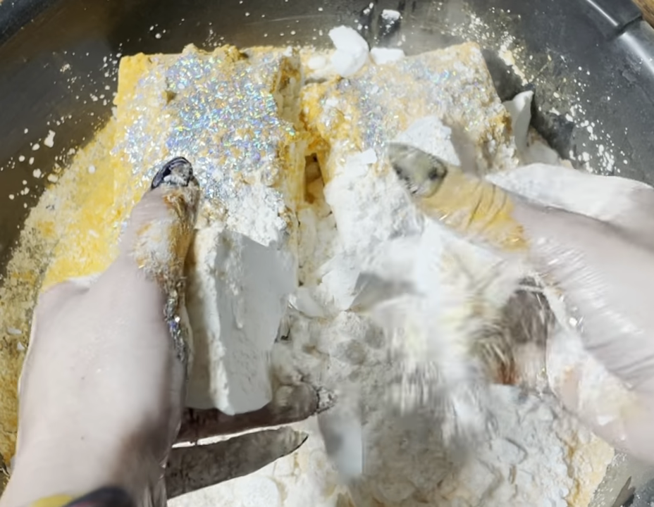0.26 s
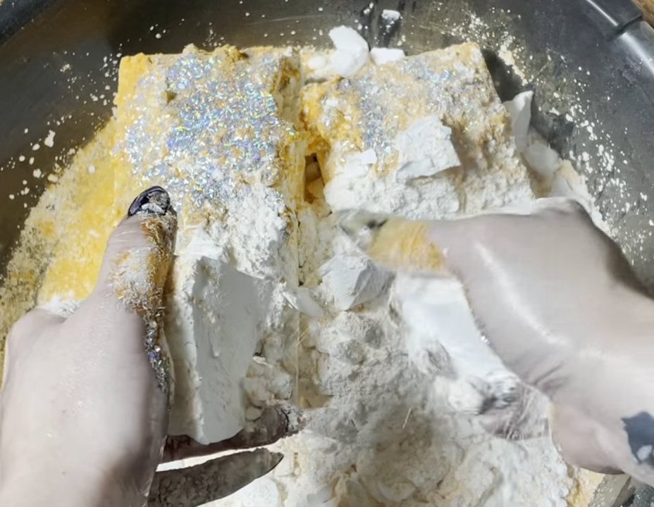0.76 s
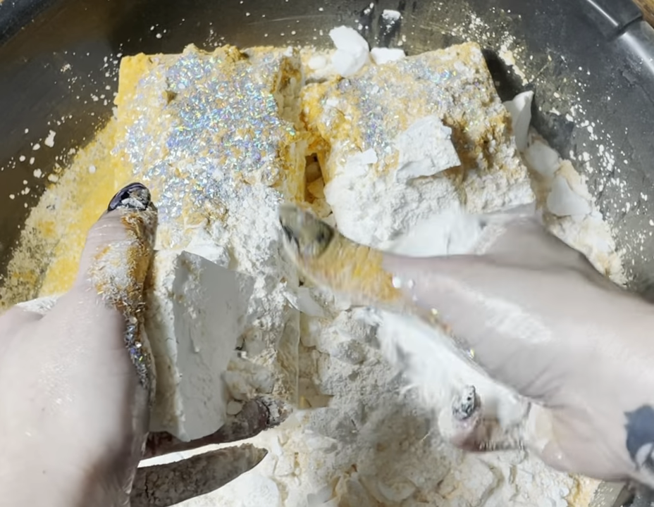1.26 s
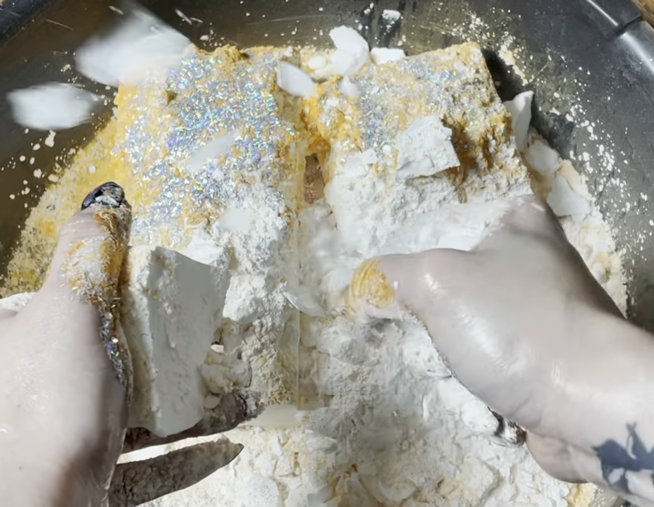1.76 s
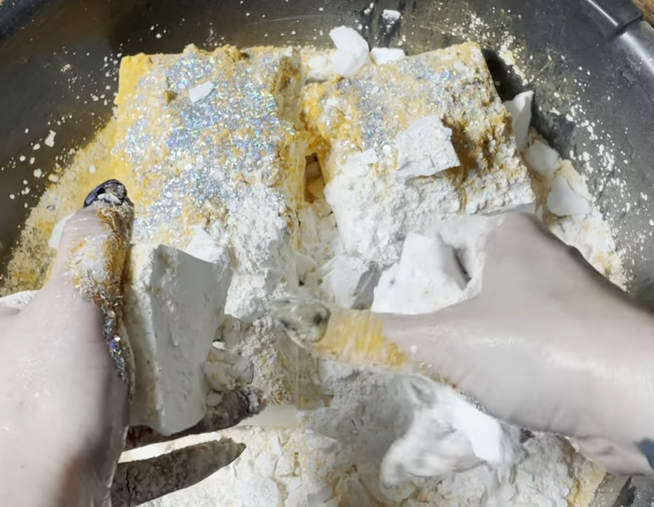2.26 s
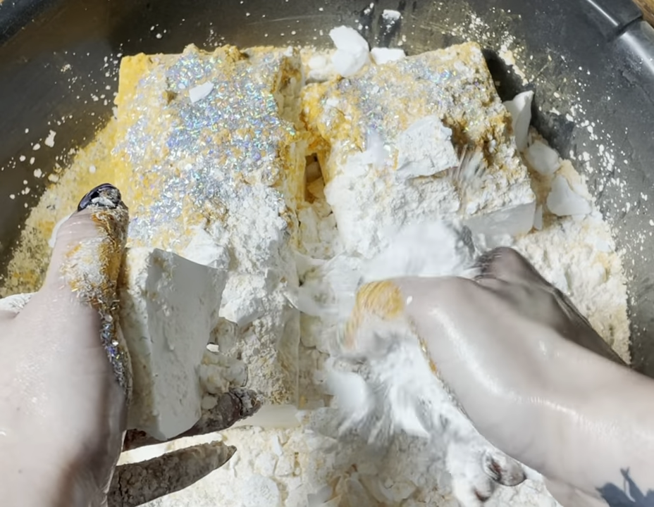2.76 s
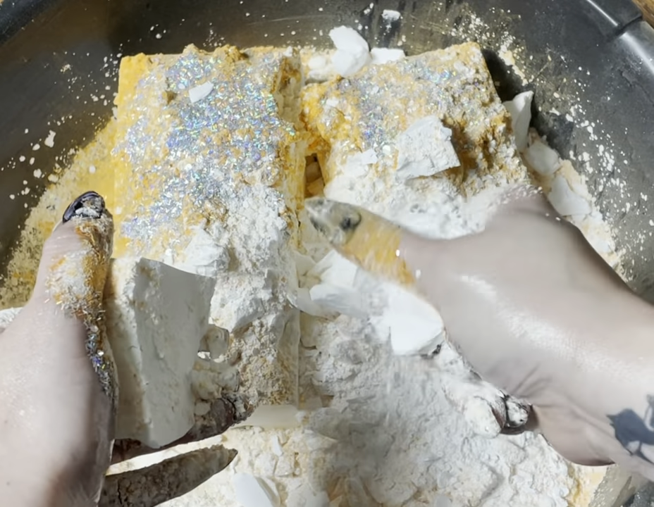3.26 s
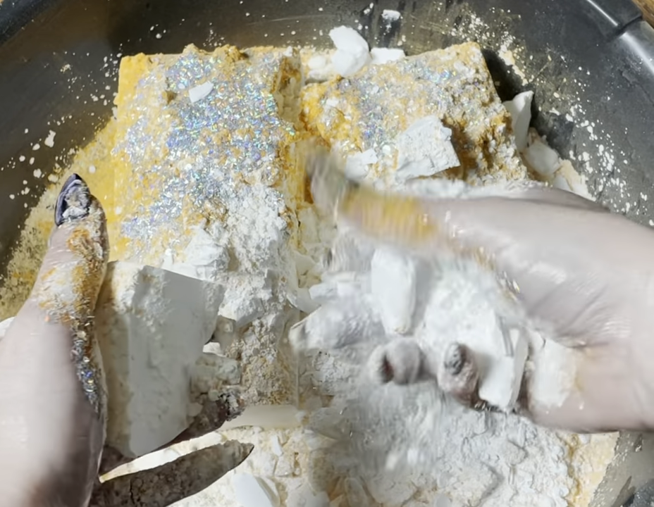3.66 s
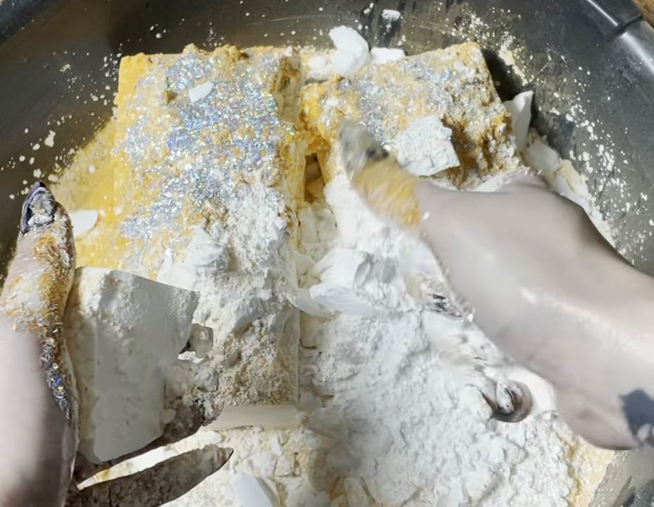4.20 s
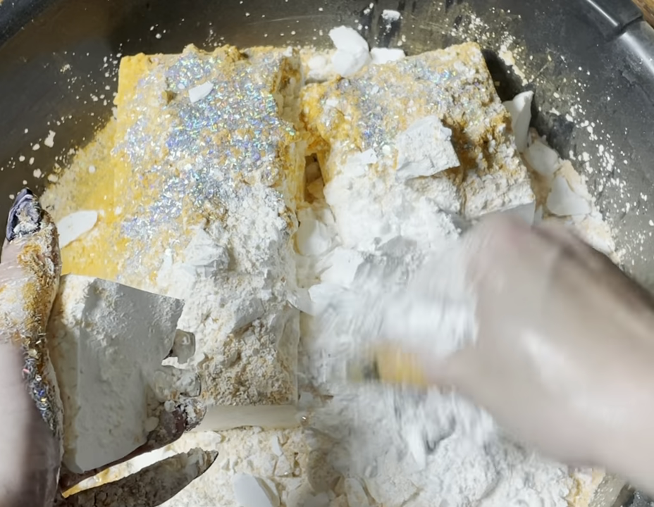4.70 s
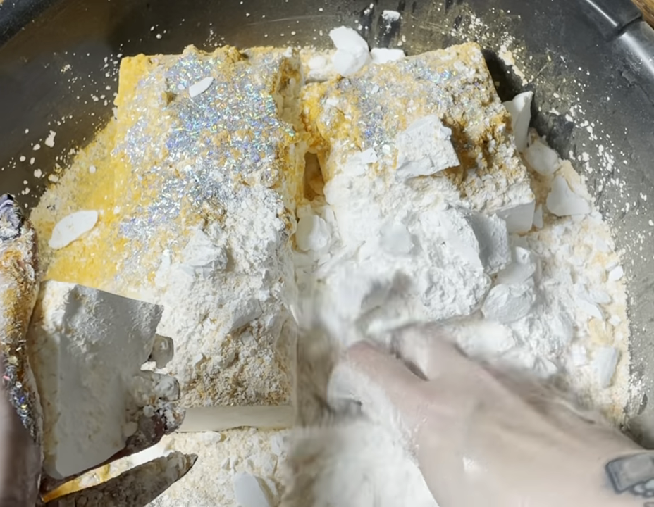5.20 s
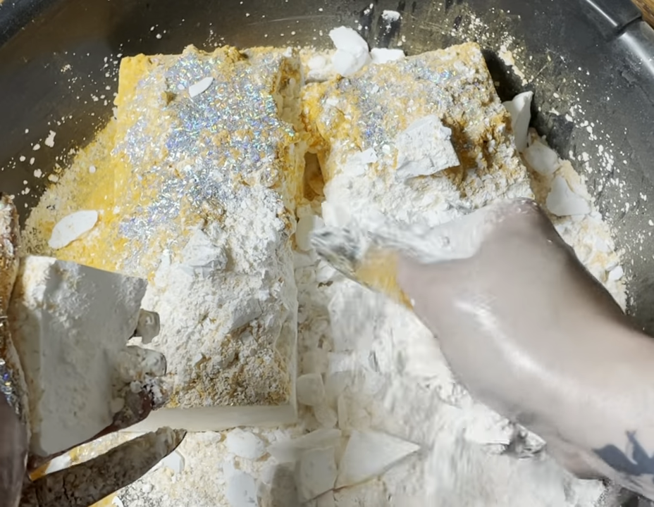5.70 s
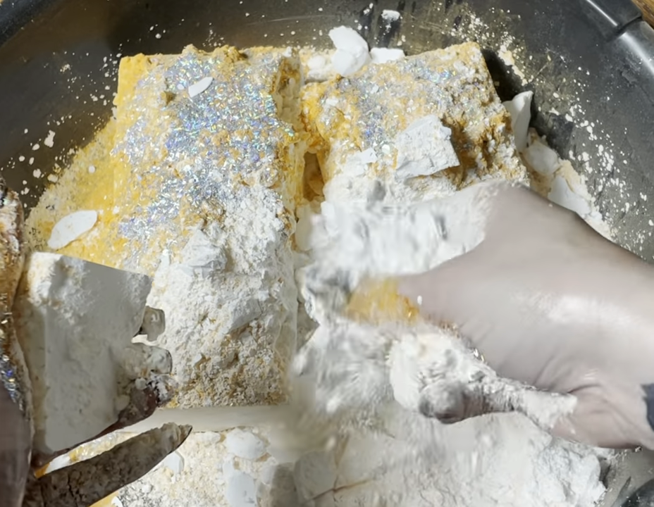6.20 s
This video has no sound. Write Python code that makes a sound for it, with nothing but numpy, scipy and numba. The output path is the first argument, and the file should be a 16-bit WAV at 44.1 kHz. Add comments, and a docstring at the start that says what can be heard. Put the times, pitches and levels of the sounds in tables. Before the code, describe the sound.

Very close stereo pickup in a quiet room: fingers softly rub gritty chalk powder, then a lump breaks in a rapid cluster of bright cracks. Crunchy kneading continues with scattered ticks and isolated snaps; the loudest crack comes before the middle. Later the hand pats the heap with a deep thud and low boom, then squeezes and crumbles again. The metal bowl adds only faint, short rings.

```python
"""Blocks of gym chalk break in a hand over a steel bowl, heard close by at a pair of microphone ports.
Lumps snap as short noise bursts with a ringing fragment; kneaded powder is dense random clicks and hiss.
Crumbs pop, lumps clack, chalk faces creak by stick-slip, and sliding dust is high-passed noise.
The bowl rings as a sum of decaying modes and booms as low noise under the leaning hand; pats are damped sines.
Stirred air and a quiet room, both shaped noise, lie behind."""
import sys
import numpy as np
from scipy import signal
from scipy.fft import rfft, irfft
from scipy.io import wavfile
from numba import njit

SR = 44100
rng = np.random.default_rng(int(sys.argv[2]) if len(sys.argv) > 2 else 0)


def wav_record(signal):
    """Record a signal, one row per channel, as 16-bit PCM in the file named by sys.argv[1]."""
    frames = np.transpose(np.atleast_2d(signal))
    bounded = np.clip(frames, -1, 1)
    # unit amplitude maps onto the largest positive 16-bit level
    quanta = np.round(bounded * 32767).astype(np.int16)
    wavfile.write(sys.argv[1], SR, quanta)


N = 284440
TIME = np.arange(N) / SR  # seconds


def from_db(db):
    """Decibel law: amplitude is ten to the level over twenty."""
    return 10 ** (np.asarray(db) / 20)


def rms_one(x):
    """Normalisation to unit effective value."""
    return x / np.sqrt(np.mean(x ** 2) + 1e-20)


def add(track, s, sound):
    """Superposition: mix a sound in at a time in seconds."""
    i = max(int(round(s * SR)), 0)
    part = track[..., i:i + sound.shape[-1]]
    part += sound[..., :part.shape[-1]]


def pan(db):
    """Level difference between channels: left and right gains whose ratio is db."""
    return from_db(np.array([[db], [-db]]) / 2)


def drift(rate):
    """Slow random modulation: noise knots at this rate per second, joined by lines, with rms 1."""
    knots = rng.standard_normal(8192)
    return rms_one(np.interp(TIME * rate, np.arange(len(knots)), knots))


def swell(start, length, attack_s, release_s):
    """Envelope of one gesture: a linear rise, a hold and an exponential decay."""
    age = TIME - start
    rise = np.clip(age / attack_s, 0, 1)
    return rise * np.exp(-np.clip((age - length) / release_s, 0, 20))


def response(spectrum, size):
    """Minimum phase: the causal impulse response of this spectrum, by folded cepstrum, with unit energy."""
    hz, db = np.transpose(spectrum)
    grid = np.maximum(np.arange(size // 2 + 1) * SR / size, 1)
    level_db = np.interp(np.log(grid), np.log(hz), db)
    cepstrum = irfft(np.log(from_db(level_db)))
    cepstrum[1:size // 2] *= 2
    cepstrum[size // 2 + 1:] = 0
    h = irfft(np.exp(rfft(cepstrum)))
    return h / np.linalg.norm(h)


def through(x, h):
    """Linear filtering: convolve a sound with an impulse response."""
    return signal.oaconvolve(np.atleast_2d(x), np.atleast_2d(h), axes=-1)[:, :N]


def rumble(spectrum):
    """Incoherent noise: shaped by a spectrum, unrelated in the two channels, rms 1."""
    return rms_one(through(rng.standard_normal((2, N)), response(spectrum, size=8192)))


@njit
def resonate(x, hz, q):
    """Resonance: a band-pass of gain 1 whose centre may move from sample to sample."""
    out, low, band = np.zeros(len(x)), 0., 0.
    for i in range(len(x)):
        g = np.tan(np.pi * hz[i] / SR)
        v = (band + g * (x[i] - low)) / (1 + g * (g + 1 / q))
        low, band = low + 2 * g * v, 2 * v - band
        out[i] = v / q
    return out


def ring(hz, db, t60):
    """Damped mode: a sine that falls 60 dB in t60 seconds."""
    t = TIME[:SR]
    return from_db(db - 60 * t / max(t60, .002)) * np.sin(2 * np.pi * hz * t)


def grains(per_s, spread_db):
    """Poisson process: randomly timed clicks of very unequal size, rms 1."""
    out, born = np.zeros(N), np.flatnonzero(rng.random(N) < per_s / SR)
    size, sign = rng.random((2, N), dtype=np.float32)[:, born]
    size_db = spread_db * np.minimum(-np.log(1 - size), 3.6)
    out[born] = from_db(size_db) * np.sign(sign - .5)
    return rms_one(out)


def placed(sound, scatter_db=2.5, scatter_ms=0.011):
    """Stereo localisation: each piece has its own slight balance and delay between the ports."""
    across, along = rng.standard_normal(2)
    khz = np.fft.rfftfreq(len(sound), 1000 / SR)
    turn = np.exp(np.pi * 1j * khz * scatter_ms * along * np.array([[1], [-1]]))
    return pan(scatter_db * across) * irfft(rfft(sound) * turn, len(sound))


# Spectra of breaking chalk, big lumps to fine grit. Each row: frequency in Hz, relative level in dB.
LUMP_SPECTRUM = [(60, -9), (170, -4), (380, 0), (560, 0), (740, -6), (1000, -0.5), (1300, -4.5),
                 (1900, -10.5), (2800, -30), (5000, -62)]
CRUNCH_SPECTRUM = [(300, -53), (900, -16), (1300, 0.5), (1600, 2), (2100, 1.5), (2600, 1.5), (3300, 2.5),
                   (4200, -1), (5200, -9), (7000, -12), (14000, -78)]
GRIT_SPECTRUM = [(1500, -84.5), (4000, -4), (5300, 1.5), (7600, 2), (8800, 1), (10300, -8), (13000, -11),
                 (16000, -24)]
# Fine grit of kneaded powder, softer than a snap around 7 to 10 kHz. Each row: frequency in Hz,
# relative level in dB.
KNEADED_GRIT_SPECTRUM = [(1500, -53), (4000, -8), (5300, 0), (7600, -1.5), (8800, -3.5), (10300, -11),
                         (13000, -11.5), (16000, -16.5)]


def chalk_voices():
    """Source spectra: impulse responses of lump body, crunch, grit of snaps and grit of kneaded powder."""
    spectra = LUMP_SPECTRUM, CRUNCH_SPECTRUM, GRIT_SPECTRUM, KNEADED_GRIT_SPECTRUM
    return [response(spectrum, size=1024) for spectrum in spectra]


# Lumps snapping. Each row: time of the sharp click in seconds, crunch level in dB before trim,
# body in dB over crunch before trim, length scale in ms (times the linger factor gives the decay constant),
# fragment pitch in Hz.
SNAPS = [(0.2588, -34, -19, 1.2, 7600), (0.357, -44, 13, 1.2, 1180), (0.5931, -33, -20, 0.7, 7300),
         (0.695, -12.5, -0.5, 0.3, 8200), (0.6977, -12.5, -2, 1.3, 6700), (0.7195, -13, -10.5, 0.43, 3820),
         (0.7339, -20, -18, 0.55, 3400), (0.75, -9, -21, 3.5, 3530), (0.7606, -16, -28, 0.45, 3380),
         (0.764, -19, -31, 0.49, 3570), (0.7701, -17, -29, 0.45, 3320), (0.7916, -4.5, -10, 1.85, 3250),
         (0.8057, -9.5, -8, 3.7, 3340), (0.8386, -6, -23, 0.41, 3500), (0.8807, -20, -23, 0.8, 6340),
         (0.928, -28, -20, 0.36, 4500), (0.9349, -20, -25, 0.4, 3770), (0.9497, -27.5, -23, 0.4, 5500),
         (0.9711, -28.5, -19, 0.5, 5000), (1.013, -30, -13, 1, 5000), (1.0439, -30, -7, 0.77, 4850),
         (1.2037, -28, -19, 0.37, 4090), (1.2325, -22, -7, 0.2, 4380), (1.3411, -32, 0, 2.6, 4100),
         (1.462, -23.5, 1.5, 2.1, 713), (1.4858, -18, -31, 0.5, 3400), (1.6402, -25.5, -22, 1.1, 3560),
         (1.6704, -9.5, -5.5, 1.3, 1120), (1.7972, -31.5, -6, 0.47, 7900), (1.918, -33, -3.5, 1.5, 8750),
         (2.012, -29, 8.5, 5.3, 1500), (2.142, -39, 9.5, 3.7, 1460), (2.397, -21, -3.5, 2.7, 4100),
         (2.433, -17, -5.5, 1.9, 3300), (2.449, -21.5, -9, 0.9, 3800), (2.5197, -7.5, -8.5, 0.18, 1710),
         (2.522, -5, -13, 1.4, 3800), (2.5638, -26, -6, 3, 4000), (2.5731, -22, -1, 0.2, 4060),
         (2.6829, -24, 1.5, 0.4, 4100), (2.6852, 2.5, -6.5, 0.59, 3500), (2.709, 0.5, -20, 0.64, 4000),
         (2.7119, -15, -1, 1.5, 2200), (2.716, -8, -12, 3, 1540), (2.7235, -5, -17, 5.9, 2030),
         (2.881, -25.5, 1, 0.8, 2080), (2.8947, -24.5, 3.5, 2.1, 2200), (2.902, -26.5, 4, 1.5, 1580),
         (3.0134, -31.5, -1, 0.34, 3920), (3.1053, -26.5, -15, 2.6, 4160), (3.3367, -31, -15, 0.3, 5370),
         (3.5926, -34, -5, 1.1, 2950), (3.6679, -29, -3, 0.7, 1160), (3.8997, -29, -5, 6.4, 3210),
         (3.9207, -25.5, -8, 2.8, 6910), (3.9308, -16.5, -7, 0.34, 1080), (3.9603, -23, -8, 0.71, 3130),
         (3.9745, -26, -11, 2.6, 3180), (3.9802, -24.5, -8, 0.5, 4660), (4.0031, -12.5, -12.5, 0.37, 3100),
         (4.0214, -16, -8.5, 0.095, 5400), (4.055, -20.5, -11.5, 1, 6360), (4.1482, -37, -2, 1.5, 4000),
         (4.4, -37.5, -18, 0.42, 8500), (4.4513, -37, 3, 1.4, 990), (4.4632, -22.5, -16, 0.19, 8800),
         (4.7688, -13, 2.5, 2.4, 1450), (4.785, -24, -7, 3, 1320), (4.97, -10, -0.5, 1.25, 1870),
         (5.2251, -25.5, 1.5, 0.87, 1050), (5.4614, -20.5, 2, 7.5, 2110), (5.5258, -28, -2, 0.89, 3200),
         (5.5695, -10, -17, 0.65, 3300), (5.5904, -34, -7, 0.9, 4500), (5.639, -26.5, 2.5, 2.3, 1520),
         (5.6576, -24.5, -4, 2.7, 5940), (5.7365, -34, -17, 1.3, 3320), (5.8122, -32.5, -1, 0.44, 5060),
         (5.845, -29.5, -20, 2.2, 3060), (6.005, -32.5, -6.5, 0.37, 1870), (6.2122, -29, -2.5, 2, 1330),
         (6.332, -29.5, 1, 0.81, 1410), (6.438, -27, -6, 1.1, 4700)]
# Level trims in dB of body, crunch and grit.
SNAP_TRIMS = [-0.56, -2.5, 0]
# Small fragments are gritty: grit over crunch at the usual pitch, before trim, and its rise with pitch.
FRAGMENT_HZ, FRAGMENT_GRIT_DB, GRIT_DB_PER_OCTAVE = 3500, -8.5, 7.5


def cracks(voices, splinter=1.57, uneven_db=4.0, linger=0.7, lead=0.11, lead_ms=0.7,
           fragment_q=3.0, fragment_db=9.5):
    """Brittle fracture: faint splinters, a sharp click, an uneven decay and a briefly ringing fragment."""
    out = np.zeros((2, N))
    ms = (np.arange(1024) - 128) / SR * 1000  # the click falls at zero
    for s, db, body_db, length_ms, hz in SNAPS:
        octaves = max(np.log2(hz / FRAGMENT_HZ), -1.4)
        grit_db = FRAGMENT_GRIT_DB + GRIT_DB_PER_OCTAVE * octaves
        length_ms = max(length_ms, .1)
        chance = rng.standard_normal((2, len(ms)))
        before = lead * np.exp(-abs(ms) / lead_ms)
        after = np.exp(-abs(ms) / (linger * length_ms))
        burst = chance[0] * from_db(uneven_db * chance[1]) * np.where(ms < 0, before, after)
        burst *= splinter * np.sqrt(length_ms) / np.linalg.norm(burst)
        burst[ms == 0] -= 1  # the sharp click
        burst += from_db(fragment_db) * resonate(burst, np.full(len(ms), float(hz)), float(fragment_q))
        snap = 0
        for voice, voice_db, trim_db in zip(voices, (body_db, 0, grit_db), SNAP_TRIMS):
            part = signal.fftconvolve(burst, voice)
            snap = snap + from_db(db + voice_db + trim_db) * part / np.linalg.norm(part)
        # a level of 0 dB means the energy of 1 ms at rms 1
        add(out, s + ms[0] / 1000, placed(np.sqrt(SR / 1000) * snap))
    return out


def crumbs(voice, crunch_db, per_s=60, tick_db=-1.5, uneven_db=5.5, ring_db=10.0, q=12.0, ceiling_db=-34):
    """Random impulses on resonators: single crumbs pop at their own pitch, harder under more pressure."""
    out = np.zeros((2, N))
    draws = rng.random((1500, 4))
    for when, keep, size, pitch in draws:
        if keep < per_s * N / SR / len(draws):
            hz = 1800 * 4 ** pitch
            pop = voice + from_db(ring_db) * resonate(voice, np.full(len(voice), hz), float(q))
            pop *= np.sqrt(SR / 1000) / np.linalg.norm(pop)
            pressure_db = min(crunch_db[int(when * N)], ceiling_db)
            db = pressure_db + tick_db + uneven_db * min(-np.log(size), 2.5)
            add(out, when * N / SR, from_db(db) * placed(pop))
    return out


# Hard chips that break off. Each row: start in seconds, frequency in Hz, level in dB, t60 in seconds.
CHIPS = [(0.7008, 7460, -9, 0.0066), (0.713, 7300, -10.5, 0.014)]


def pings():
    """Free vibration: small hard chips ring briefly as they break off."""
    out = np.zeros(N)
    for s, hz, db, t60 in CHIPS:
        add(out, s, ring(hz, db, t60))
    return out


# Fingers squeezing or rubbing the powder. Each row: start in seconds, length in seconds, crunch level in dB,
# body in dB over crunch, grit in dB over crunch, mid-gesture hollow of the hand in Hz; levels before trims.
FINGER_SQUEEZES = [(0.0, 0.033, -45.5, -5, -4, 2670), (0.048, 0.049, -54.5, -19, 9, 3020),
                   (0.246, 0.14, -58, 0.5, 8, 1700), (0.442, 0.17, -54.5, -7, 4, 2830),
                   (0.61, 0.062, -44.5, -1, 1, 2000), (0.703, 0.037, -36.5, 1, 0, 3300),
                   (0.736, 0.13, -37.5, -9, -6, 3500), (0.915, .11, -48.5, -3.5, -0.5, 3500),
                   (1.12, 0.16, -46.5, -5, 3, 2440), (1.31, 0.233, -50.5, -0.5, 0, 2620),
                   (1.533, 0.081, -42.5, -8.5, -8, 3120), (1.948, 0.027, -41, -5.5, -2, 1320),
                   (2.118, 0.12, -48, -2, -6.5, 1900), (2.288, 0.202, -48.5, -2, -2.5, 2200),
                   (2.54, 0.39, -48, -8, -3, 2550), (3.091, 0.245, -49, 1, 1, 1900),
                   (3.351, 0.1, -44, -4, -5, 2430), (3.585, 0.11, -53.5, 0, -6, 1430),
                   (3.76, 0.21, -53, -2, 1, 2150), (3.951, 0.21, -46, -3, 0, 2900),
                   (4.195, 0.067, -48.5, -4, -8, 2400), (4.417, 0.25, -47, -3, -3.5, 2280),
                   (4.896, 0.106, -53.5, 15, -24, 1400), (5.036, 0.1, -45, 2, -3, 1600),
                   (5.142, 0.15, -40, 5, -5, 1730), (5.313, 0.24, -45.5, 4, -11, 1540),
                   (5.573, .18, -42, -0.5, -4.5, 2800), (5.749, 0.17, -47.5, -2.5, -9, 2700),
                   (5.996, .075, -47, -12, -17, 2250), (6.155, 0.25, -45, -3.5, -5.5, 1910)]
SQUEEZE_ATTACK_S, SQUEEZE_RELEASE_S = 0.015, 0.025
CLOSING_OCTAVES_PER_S = 1.2  # the hollow shrinks as the hand closes
# Broken lumps falling to rubble. Each row: start in seconds, crunch level in dB, body in dB over crunch,
# grit in dB over crunch, hollow of the hand in Hz; levels before trims.
RUBBLE_FALLS = [(0.863, -32.5, -18.5, -8, 3670), (1.67, -34, -7.5, -4, 1280), (2.012, -38, 6.5, -12, 1700),
                (2.526, -29.5, -11.5, -12, 2580), (2.712, -23, -8, -8.5, 2600), (2.9, -38, 0.5, -9, 1700),
                (4.76, -36, 3, -7.5, 1650), (4.972, -33, 3.5, -13, 1540)]
COLLAPSE_ATTACK_S, RUBBLE_SETTLE_S = 0.002, 0.044
TRICKLE_DB, TRICKLE_SETTLE_S = -16.5, 0.17  # the last crumbs run on after the rubble has settled
# Fingers resting in the powder. One row: crunch level in dB, body in dB over crunch, grit in dB over crunch,
# hollow of the hand in Hz; levels before trims.
RESTING_FINGERS = (-59.5, 1, 2, 2304)


def handling(waver_db=0.3, waver_rate=28):
    """Energy addition: gestures sum in power to crunch, body and grit levels and a mean hollow pitch."""
    gestures = [(np.ones(N), *RESTING_FINGERS)]
    for start, length, *levels, hz in FINGER_SQUEEZES:
        envelope = swell(start, length, SQUEEZE_ATTACK_S, SQUEEZE_RELEASE_S)
        closing = CLOSING_OCTAVES_PER_S * np.clip(TIME - start - length / 2, -length, length)
        gestures.append((envelope, *levels, hz * np.exp2(closing)))
    for start, *colour in RUBBLE_FALLS:
        rubble = swell(start, 0, COLLAPSE_ATTACK_S, RUBBLE_SETTLE_S)
        trickle = from_db(TRICKLE_DB) * swell(start, 0, COLLAPSE_ATTACK_S, TRICKLE_SETTLE_S)
        gestures.append((rubble + trickle, *colour))
    crunch = body = grit = hollow = 0
    for envelope, db, body_db, grit_db, hz in gestures:
        power = (from_db(db) * envelope) ** 2
        crunch = crunch + power
        body = body + power * from_db(body_db) ** 2
        grit = grit + power * from_db(grit_db) ** 2
        hollow = hollow + power * hz
    crunch_db, body_db, grit_db = 10 * np.log10([crunch, body / crunch, grit / crunch])
    return crunch_db + waver_db * drift(waver_rate), body_db, grit_db, hollow / crunch


# Level trims in dB of body, crunch and grit.
POWDER_TRIMS = [-1.5, -1.5, 1]


def powder(voices, crunch_db, body_db, grit_db, hollow_hz, per_s=1700, spread_db=3.5, clump_db=2.0,
           clump_rate=130, hiss=0.5, own=0.97, hollow_q=4.0, hollow_db=-3.5, flutter_octaves=0.49,
           flutter_rate=90, stray=0.32):
    """Granular friction: crumbs collapse in clumps over rubbing hiss; more pressure breaks more of them."""
    pressure = from_db(.35 * (crunch_db - np.mean(crunch_db)))
    shared_crumbs = grains(per_s * pressure, spread_db)
    clumps = from_db(clump_db * drift(clump_rate))
    # gaps between the fingers open and close, so the hollow's pitch flutters
    flutter = 2 ** (flutter_octaves * drift(flutter_rate))
    hollow_hz = np.minimum(hollow_hz * flutter, SR / 3)
    out = 0
    for voice, voice_db, trim_db in zip(voices, (body_db, 0, grit_db), POWDER_TRIMS):
        own_crumbs = grains(per_s * pressure, spread_db)
        clicks = (shared_crumbs + own * own_crumbs) / np.sqrt(pressure)
        drive = rms_one(clumps * (clicks + hiss * rng.standard_normal(N)))
        drive = drive + from_db(hollow_db) * resonate(drive, hollow_hz, float(hollow_q))
        # crumbs off to the sides reach the two ports differently
        drive = drive + stray * clumps * grains(per_s, spread_db) * np.array([[1], [-1]])
        out = out + rms_one(through(drive, voice)) * from_db(crunch_db + voice_db + trim_db)
    return out


def tumbling(crunch_db, body_db, per_s=170, lump_db=-7.0, spread_db=4.5, q=8.0, low_hz=330, high_hz=1150):
    """Impact excitation: rolling lumps clack softly at set pitches, mostly when the sound is all body."""
    clacks = grains(per_s, spread_db)
    pitches = np.geomspace(low_hz, high_hz, num=9)
    dealt = rng.integers(0, len(pitches), N)  # which pitch each clack strikes
    rings = 0
    for k, hz in enumerate(pitches):
        b, a = signal.iirpeak(hz, max(q, 1), fs=SR)
        rings = rings + signal.lfilter(b, a, clacks * (dealt == k) + 1e-18)
    return from_db(lump_db + crunch_db + body_db + np.minimum(body_db, 0)) * rms_one(rings)


# Chalk slipping on chalk. Each row: start in seconds, end in seconds, slips per second, resonance in Hz,
# level in dB.
SLIPS = [(1.142, 1.203, 195, 1600, -42), (1.542, 1.604, 280, 3250, -69), (2.018, 2.12, 380, 2150, -44.5),
         (4.242, 4.312, 350, 2110, -52)]


def creaks(jitter=.1, uneven_db=1.5, q=2.0):
    """Stick-slip friction: two faces give a quick, nearly regular run of clicks that swells and fades."""
    out = np.zeros(N)
    for start, end, per_s, hz, db in SLIPS:
        span = max(end - start, .02)
        chance = rng.standard_normal((2, 64))
        at = np.cumsum(np.maximum(1 + jitter * chance[0], .1)) / per_s
        heard = at < span
        arch = np.sqrt(np.sin(np.pi * at[heard] / span))
        slips = np.zeros(int(span * SR) + 1)
        slips[(at[heard] * SR).astype(int)] = from_db(uneven_db * chance[1, heard]) * arch
        creak = resonate(slips, np.full(len(slips), float(hz)), float(q))
        add(out, start, from_db(db) * rms_one(creak))
    return out


# Fine dust sliding off the heap. Each row: start in seconds, length in seconds, level in dB.
DUST_SLIDES = [(0.605, 0.036, -38), (1.194, 0.069, -47), (1.991, 0.086, -42), (5.04, .13, -46),
               (5.184, 0.061, -38.5)]
DUST_ATTACK_S, DUST_RELEASE_S = 0.035, 0.02


def dust(low_hz=7500):
    """Broadband friction noise: sliding dust gives a smooth, airy hiss."""
    airy = signal.butter(2, min(low_hz, SR / 3), "high", fs=SR, output="sos")
    flow = 0
    for start, length, db in DUST_SLIDES:
        flow = flow + from_db(db) * swell(start, length, DUST_ATTACK_S, DUST_RELEASE_S)
    return flow * rms_one(signal.sosfilt(airy, rng.standard_normal(N)))


# Knocks on the bowl. Each row: start in seconds, strength in dB, contact time in ms.
BOWL_KNOCKS = [(1.464, -9, 3.1), (2.015, -8.5, 0.91), (2.897, -3, 3.15), (4.773, -15, 0.23)]
# Modes of the steel bowl. Each row: frequency in Hz, relative level in dB, t60 in seconds,
# left over right in dB.
BOWL_MODES = [(87.5, -33.5, 0.5, 25), (288, -39, 1, 23), (284.5, -41, 0.55, 27.5), (620, -34, 0.83, -10),
              (1318, -22, 0.3, -21), (1420, -26, 0.32, -25), (1440, -26, 0.08, -31), (1410, -23, 0.44, 12),
              (1520, -20, 0.48, -4), (1850, -26, 0.31, 8), (2430, -46, .12, 0)]


def bowl(rattle_db=4.0, rattle_rate=110):
    """Modal synthesis: a long contact wakes only the low modes; loose chalk makes the ring waver."""
    out = np.zeros((2, N))
    for s, db, contact_ms in BOWL_KNOCKS:
        for hz, mode_db, t60, pan_db in BOWL_MODES:
            softness = 1 + (hz * contact_ms / 1000 * 2) ** 4 / 2
            add(out, s, pan(pan_db) * ring(hz, db + mode_db, t60) / softness)
    return out * from_db(rattle_db * drift(rattle_rate))


# Dull thuds of the palm or a lump on the heap. Each row: start in seconds, frequency in Hz, peak level in dB,
# rise constant in seconds (the envelope peaks at twice this).
HEAP_PATS = [(0.697, 343, -34, 0.0047), (1.671, 363, -19, 0.0012), (1.672, 173, -32.5, 0.0035),
             (2.015, 234, -38, 0.0049), (2.434, 300, -25, 0.0011), (2.684, 355, -20, 0.0012),
             (4.9706, 174, -13.5, 0.002), (4.9808, 96, -13, 0.0089), (5.5702, 537, -19.5, 0.0008),
             (5.657, 620, -35, 0.0046), (5.672, 383, -34.5, 0.0036)]


def pats():
    """Cushioned impact: each thud is a low sine under a smooth pulse."""
    out = np.zeros(N)
    t = TIME[:SR // 4]
    for s, hz, db, rise in HEAP_PATS:
        envelope = (t / (2 * rise)) ** 2 * np.exp(2 - t / rise)
        add(out, s, -from_db(db) * envelope * np.sin(2 * np.pi * hz * t))
    return out


# The hand leaning on the bowl. Each row: start in seconds, length in seconds, level in dB before panning.
HAND_LEANS = [(0.258, 0.21, -41.5), (0.697, 0.051, -41), (0.769, 0.017, -34), (1.313, 0.33, -49.5),
              (2.007, 0.047, -35), (2.565, 0.19, -38.5), (2.902, .09, -31.5), (3.017, 0.4, -40.5),
              (4.746, 0.28, -30.5), (4.968, 0.041, -18), (5.048, 0.32, -27), (5.576, .12, -32),
              (5.745, 0.2, -43.5)]
LEAN_ATTACK_S, LEAN_RELEASE_S, RESTING_BOOM_DB = 0.017, 0.031, -50
# Spectrum of the boom. Each row: frequency in Hz, relative level in dB.
BOOM_SPECTRUM = [(30, -26), (60, -21), (78, 3.5), (92, 6.5), (108, -3), (130, -9.5), (180, -23.5),
                 (400, -60)]


def bowl_boom(pan_db=2.5):
    """Forced vibration: the leaning hand keeps the bowl booming; leans add in power."""
    lean = from_db(RESTING_BOOM_DB)
    for start, length, db in HAND_LEANS:
        lean = np.hypot(lean, from_db(db) * swell(start, length, LEAN_ATTACK_S, LEAN_RELEASE_S))
    return lean * pan(pan_db) * rumble(BOOM_SPECTRUM)


# Air stirred by the arm, most while it pats the heap. Each row: time in seconds, level in dB before gain.
ARM_STIR = [(0.0, -50), (1.83, -45.5), (4.71, -48), (5.01, -23.5), (5.19, -33.5), (5.46, -27),
            (5.95, -47.5), (6.4, -42.5), (6.45, -55)]
# Spectrum of the stirred air. Each row: frequency in Hz, relative level in dB.
AIR_SPECTRUM = [(10, -3.5), (22, 6), (32, -19), (45, -4), (62, -11.5), (100, -18.5), (300, -66.5)]


def stirred_air(gain_db=4.5, pan_db=-2.5):
    """Flow noise: low rumble that follows the moving arm."""
    s, db = np.transpose(ARM_STIR)
    stir_db = np.interp(TIME, s, db)
    return from_db(stir_db + gain_db) * pan(pan_db) * rumble(AIR_SPECTRUM)


def reflections(x, near_db=-14, near_t60=0.031, wall_db=-13, wall_t60=0.0097, room_db=-24, room_t60=0.45,
                dull_hz=7500):
    """Reverberation: heap echoes reach both ports alike; bowl wall and faint room tail are diffuse."""
    t = TIME[:SR // 2]
    dull = signal.butter(1, min(dull_hz, SR / 3), fs=SR, output="sos")
    h = np.zeros((2, len(t)))
    for db, t60, channels in ((near_db, near_t60, 1), (wall_db, wall_t60, 2), (room_db, room_t60, 2)):
        tail = rng.standard_normal((channels, len(t))) * from_db(-60 * t / t60) * (t > .0005)
        h += from_db(db) * signal.sosfilt(dull, tail / np.linalg.norm(tail[0]))
    return through(x, h)


PORT_LAG_MS, PAN_DB = 0.033, -2


def ports(x):
    """Interaural cues: chalk to the right reaches the left port a little later and softer."""
    hz = np.arange(N // 2 + 1) * SR / N
    late = irfft(rfft(x[0]) * np.exp(-2j * np.pi * hz * PORT_LAG_MS / 1000), N)
    return np.array([late, x[1]]) * pan(PAN_DB)


# Spectrum of the room air. Each row: frequency in Hz, relative level in dB.
ROOM_SPECTRUM = [(20, 5.5), (90, -2), (180, -4), (500, -13.5), (2000, -44), (8000, -36), (16000, -30)]
ROOM_DB = -53


def room_air():
    """Background noise: a steady, diffuse floor."""
    return from_db(ROOM_DB) * rumble(ROOM_SPECTRUM)


def scene():
    """Superposition of chalk, bowl, hand and room air."""
    body, crunch, grit, kneaded_grit = chalk_voices()
    crunch_db, body_db, grit_db, hollow_hz = handling()
    crumb_voice = crunch + 0.13 * grit + 0.83 * body
    breaking = cracks([body, crunch, grit]) + crumbs(crumb_voice, crunch_db) + pings()
    kneading = powder([body, crunch, kneaded_grit], crunch_db, body_db, grit_db, hollow_hz)
    kneading = kneading + tumbling(crunch_db, body_db)
    chalk = breaking + kneading + creaks() + dust()
    hand = pats() + bowl_boom() + stirred_air()
    return ports(chalk + reflections(chalk)) + bowl() + hand + room_air()


CUTOFF_HZ = 16000


def record(dry):
    """Saturation and band limiting: the loudest snaps overload smoothly and the top is cut."""
    clipped = dry / (1 + dry ** 6) ** (1 / 6)
    top_cut = signal.ellip(10, .2, 100, CUTOFF_HZ, fs=SR, output="sos")
    return signal.sosfilt(top_cut, clipped)


dry = scene()
out = record(dry)
wav_record(out)
```